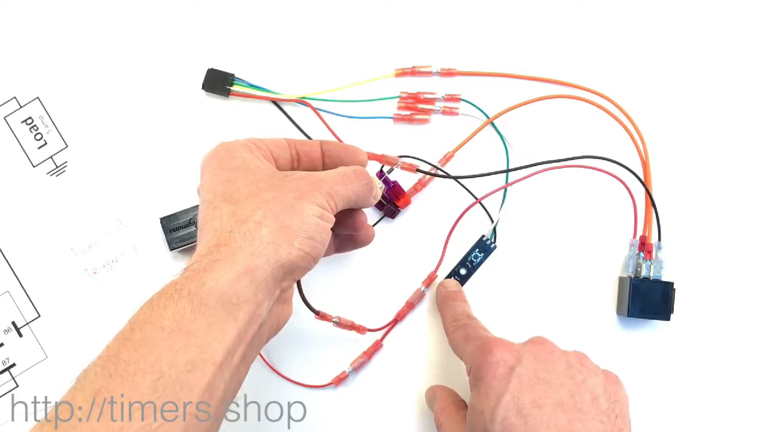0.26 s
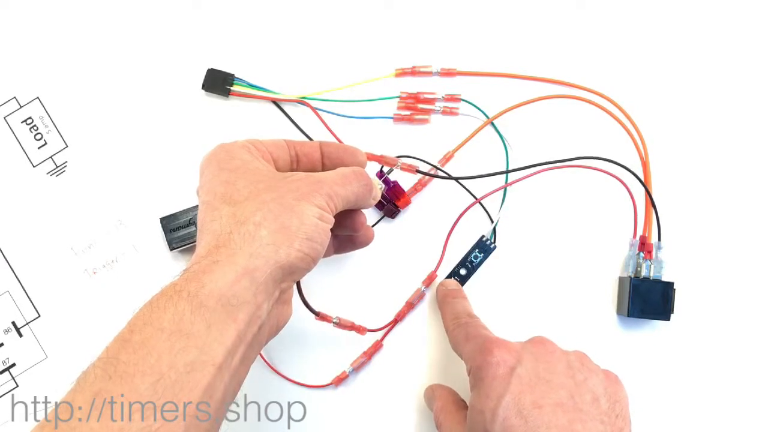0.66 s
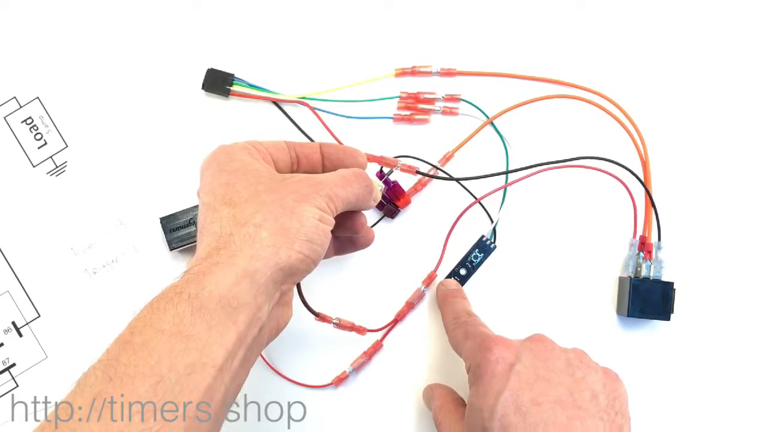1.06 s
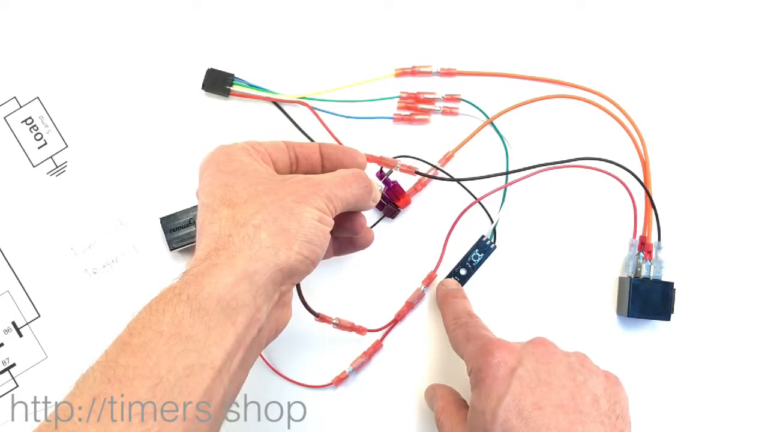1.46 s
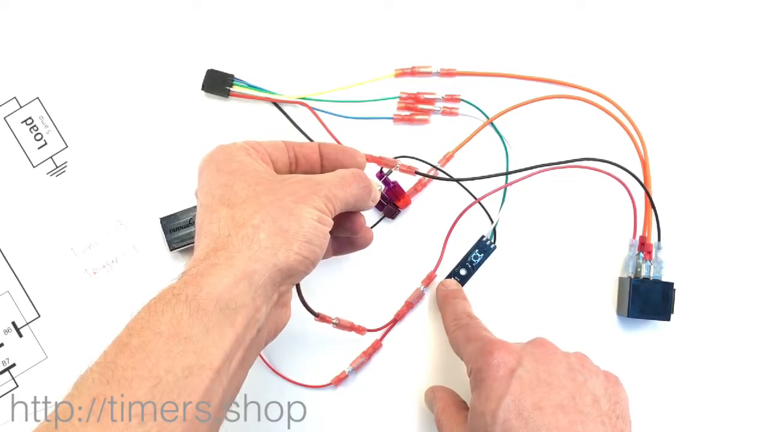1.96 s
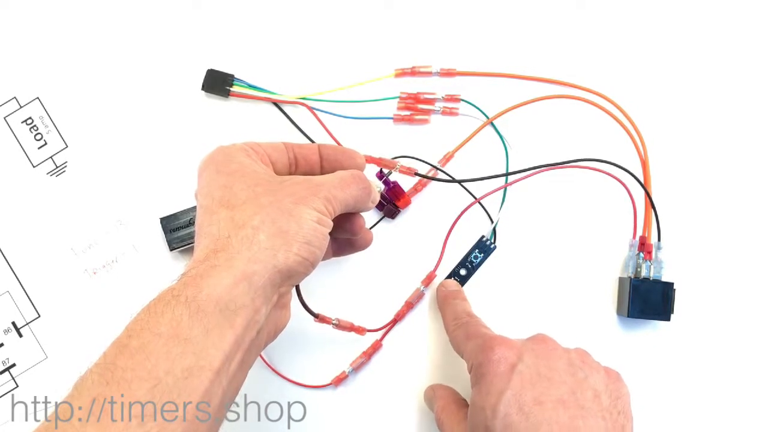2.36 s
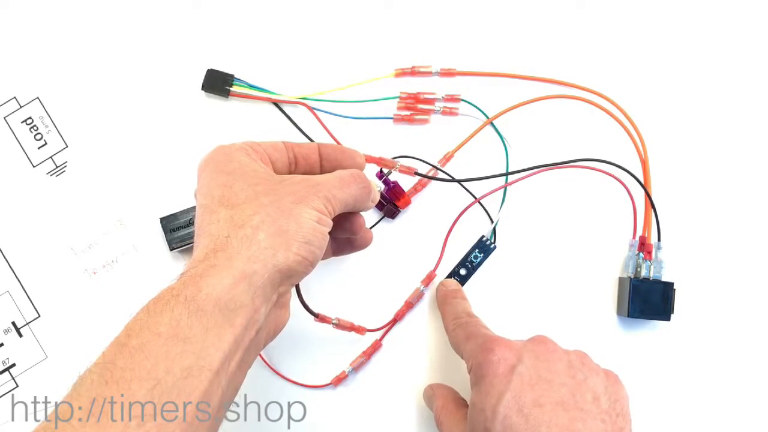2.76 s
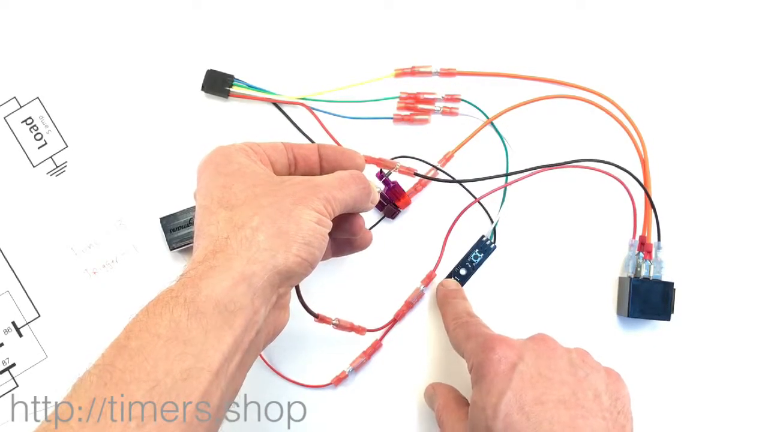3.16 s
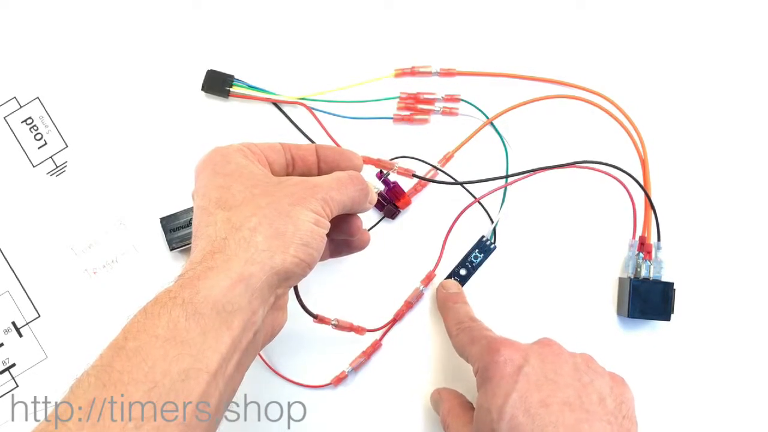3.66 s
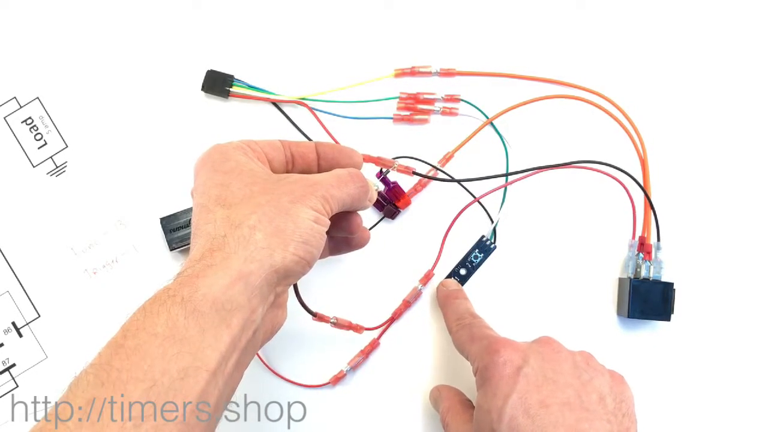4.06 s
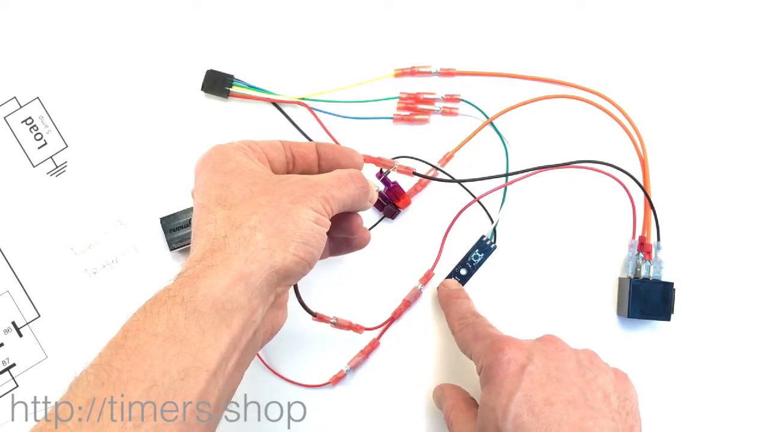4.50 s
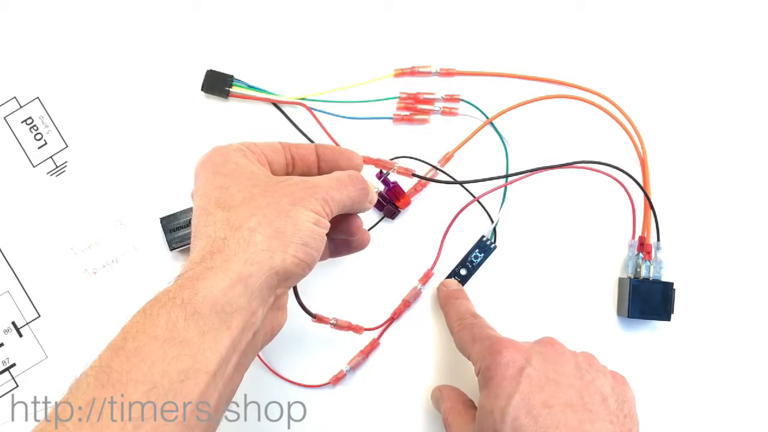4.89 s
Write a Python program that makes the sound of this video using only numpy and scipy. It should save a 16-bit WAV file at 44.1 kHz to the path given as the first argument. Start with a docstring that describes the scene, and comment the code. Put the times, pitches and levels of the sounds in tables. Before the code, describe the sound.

A small relay clicks off and on in crisp, evenly paced pairs, each led by the faint tick of a tiny button.

```python
"""Push button and timer relay on a work table

A fingertip works a tiny button about every 0.65 s. After each release a timer drops a small, close relay
out and pulls it in again a fifth of a second later: two clicks of bouncing, ringing metal. The table top
thuds under button and relay. A small room answers, over a low rumble and a faint hiss that steps up
at some of the clicks and cuts off a moment later."""
import sys
import numpy as np
from scipy import signal
from scipy.fft import rfft, irfft, next_fast_len
from scipy.io import wavfile
from scipy.ndimage import uniform_filter1d

SR = 44100
rng = np.random.default_rng(int(sys.argv[2]) if len(sys.argv) > 2 else 0)


def generate_wav(sig):
    """Save sig (samples, or channels by samples) to the path in sys.argv[1] as 16-bit PCM at SR."""
    pcm = np.round(np.clip(np.atleast_2d(sig).T, -1, 1) * 32767).astype(np.int16)
    wavfile.write(sys.argv[1], SR, pcm)


N = 226365

# the finger on the button: pressed_s, released_s, force_db
PRESSES = [(-.33, -0.2124, 0), (.3357, .429, -1.5), (0.9464, 1.0906, 1), (1.579, 1.7122, 0),
           (2.253, 2.3766, 3), (2.9329, 3.057, -1), (3.6263, 3.7501, .5), (4.301, 4.415, -1),
           (5.041, 5.17, -0.5)]
TIMER_DELAY_S, RELAY_OFF_S = .111, .1965  # from release to drop-out, from drop-out to pull-in
DROP_TIMES_S = [released_s + TIMER_DELAY_S for _, released_s, _ in PRESSES]
PULL_TIMES_S = [drop_s + RELAY_OFF_S for drop_s in DROP_TIMES_S]


def relay_pull_in(gain_db):
    """The coil snaps the armature onto the core."""
    # impacts within one stroke: delay_s, level_db, tilt_db_per_octave
    impacts = [(0, 0.96, -1.5), (.002, -0.4, 1), (.0027, -5.5, -0.9), (.00463, 2.5, .5)]
    # ring of core, yoke and case: pitch_hz, level_db, t60_s
    core_modes = [(2150, -20, 0.068), (2440, -12, 0.031), (3030, -12, 0.022), (2874, -12.5, 0.045),
                  (3296, -6, 0.025), (3720, -4.5, 0.0098), (4005, -9.5, 0.039), (4290, -3.5, 0.012),
                  (4540, -9.5, 0.011), (5366, -21.5, 0.04), (6100, -17.5, 0.011), (6630, -16.5, 0.015),
                  (7430, -24, 0.05), (9800, -30, 0.056), (10550, -20, 0.022), (10960, -16.5, 0.016),
                  (11430, -19, 0.012)]
    # their dense, quickly damped modes: frequency_hz, density_db
    core_crack = [(600, -54), (1450, -19), (1950, -7.5), (2300, 8), (4450, 0.5), (5200, -6.5), (6600, -3),
                  (8000, -11.5), (11100, 0.5), (12300, -10.5), (15500, -8.5), (16300, -24)]
    return relay_strokes(PULL_TIMES_S, gain_db, impacts, core_modes, core_crack,
                         crack_t60=.017, snap_db=4.5, snap_t60=0.0049, thud_db=-22.5)


def relay_drop_out(gain_db):
    """The spring throws the armature back; the blade pings just before it hits the back stop."""
    # impacts within one stroke: delay_s, level_db, tilt_db_per_octave
    impacts = [(.0032, -4.5, -1.5), (.0038, 0, 1), (.0044, -11.5, 4.5), (.0078, -7, 3)]
    # ring of the contact spring and back stop: pitch_hz, level_db, t60_s
    spring_modes = [(2305, -10.5, 0.015), (2720, -9.5, 0.017), (3365, -24, 0.056), (3936, -27.5, 0.06),
                    (4934, -9.5, 0.028), (6150, -5, 0.015), (6520, -19, 0.017), (7190, -13, 0.024),
                    (9100, -11, 0.018), (9840, -19, 0.014), (10290, -14.5, 0.039), (10700, -5, 0.024),
                    (10900, -31, 0.017), (12700, -16, 0.023), (15500, -7, .016)]
    # their dense, quickly damped modes: frequency_hz, density_db
    spring_crack = [(600, -26), (1300, -23), (2000, -1.5), (4000, -4.5), (7000, -7), (8000, -20),
                    (9300, -2), (10500, 2), (11800, -9.5), (13000, -2.5), (14100, -20), (15500, -5),
                    (16300, -23)]
    pings = blade_pings(gain_db)
    return pings + relay_strokes(DROP_TIMES_S, gain_db, impacts, spring_modes, spring_crack,
                                 crack_t60=0.02, snap_db=8.5, snap_t60=0.0047, thud_db=-36.5)


def relay_strokes(times_s, gain_db, impacts, modes, spectrum, crack_t60, snap_db, snap_t60, thud_db):
    """Every stroke is the same quick run of impacts: contacts meet, the armature lands and bounces."""
    t = np.arange(SR // 4) / SR
    track = np.zeros(N)
    # a hard snap at the moment of contact, on top of the slower decay of the whole mechanism
    new_crack = lambda: burst(spectrum, t, crack_t60) + amp(snap_db) * burst(spectrum, t, snap_t60)
    common_crack = new_crack()
    common_share = 0.34  # of the crack's power, alike in all impacts
    # the same parts meet in the same places, so each impact keeps its sound from stroke to stroke
    for delay_s, impact_db, tilt in impacts:
        crack = np.sqrt(common_share) * common_crack + np.sqrt(1 - common_share) * new_crack()
        hardness = lambda hz: tilt * np.log2(np.clip(hz, 1000, SR) / 5000)
        blow = coloured(ring(modes, t, scatter_db=-0.8) + crack, hardness)
        for start_s in times_s:
            add(track, start_s + delay_s, amp(gain_db + impact_db + 0.14 * rng.standard_normal()) * blow)
    track = small_case(track)
    for start_s in times_s:  # the low end comes from the table
        thud = table_thud(rise_s=0.006, ring_db=5)
        add(track, start_s + 0.00087, amp(gain_db + thud_db) * thud)
    return track


def blade_pings(gain_db):
    """The contact blade rings as it springs free at each drop-out."""
    # ring of the blade: pitch_hz, level_db, t60_s
    blade_modes = [(2560, -11, 0.014), (3853, -1, 0.025), (4520, -7, 0.0047), (6440, -16, .005),
                   (10300, -13, 0.0068), (13200, -10, 0.0077)]
    t = np.arange(SR // 10) / SR
    track = np.zeros(N)
    for start_s in DROP_TIMES_S:
        add(track, start_s, amp(gain_db) * ring(blade_modes, t, scatter_db=1))
    return small_case(track)


def small_case(x, corner_hz=1100):
    """A case much smaller than the wavelength radiates little bass."""
    return signal.sosfilt(signal.butter(3, corner_hz, 'high', fs=SR, output='sos'), x)


def button():
    """A metal dome ticks going down and softly coming up; the fingertip bumps the table both ways."""
    # tick of the dome: frequency_hz, density_db
    tick_spectrum = [(800, -13), (3500, -5.5), (6000, -8), (7500, -2), (8150, 7.5), (9500, 0.5),
                     (12000, -1), (15500, -6)]
    t = np.arange(SR // 4) / SR
    track = np.zeros(N)
    for pressed_s, released_s, force_db in PRESSES:
        press = (pressed_s, force_db - 44.5, force_db - 55)
        lift = (released_s, -68, -56)
        for start_s, tick_db, thud_db in (press, lift):
            snap = amp(3) * burst(tick_spectrum, t, t60=0.0022)
            tail = burst(tick_spectrum, t, t60=0.029)
            add(track, start_s, amp(tick_db) * (snap + tail))
            add(track, start_s, amp(thud_db) * table_thud(rise_s=0.00043, ring_db=-8))
    return track


def table_thud(rise_s, ring_db):
    """A blow spreads through the table top: a few low notes ring over a short, dull wash."""
    # ring of the table top: pitch_hz, level_db, t60_s
    table_modes = [(168.8, -21.5, 0.42), (268.9, -11.5, 0.44), (422.5, -13.5, 0.26), (448, -6.5, 0.25),
                   (590, -24, 0.03), (664.3, -2, 0.16), (825, -1, 0.049)]
    # its damped modes in between: frequency_hz, density_db
    wash_spectrum = [(60, 12.5), (250, 18), (750, 13.5), (1100, 2.5), (2500, -10), (6000, -35)]
    t = np.arange(SR // 3) / SR
    wash = noise(wash_spectrum, len(t)) * amp(-60 * t / 0.12)
    attack = 1 - np.exp(-t / rise_s)
    return (amp(ring_db) * ring(table_modes, t, scatter_db=2) + wash) * attack


def room_reverb(x):
    """The walls answer after a short gap, each frequency dying at its own speed."""
    # decay of the room: frequency_hz, t60_s
    decay_times = [(200, 0.9), (2000, 0.13), (6000, 0.15), (10000, 0.21), (16000, 0.11)]
    hz, t, bands = signal.stft(rng.standard_normal(SR // 2), SR, nperseg=256)
    decay = amp(-60 * t / along(decay_times, hz)[:, None])
    tail = signal.istft(bands * decay, SR, nperseg=256)[1]
    tail *= 1 - np.exp(-(np.arange(len(tail)) / SR / 0.0021) ** 2)  # fades in over a few milliseconds
    return signal.fftconvolve(x, tail / np.linalg.norm(tail))[:N]


def room_tone(rumble_db, drone_db):
    """A steady bed of rumble with a narrow drone at 168 Hz."""
    # rumble of the room: frequency_hz, density_db
    rumble_spectrum = [(16, -32), (28, 0.5), (59, -1.5), (106, -9), (171, -11), (342, -17), (393, -26.5),
                       (478, -26.5), (767, -22.5), (834, -23), (1300, -24), (2400, -27.5), (2920, -28.5),
                       (4680, -33), (15500, -38.5)]
    drone = noise([(135, -62), (160, -10), (168, 21.0), (176, -11.5), (205, -52)], N)
    return amp(rumble_db) * noise(rumble_spectrum, N) + amp(drone_db) * drone


def gated_hiss(level_db, hold_s):
    """A faint hiss switches on abruptly and cuts off hold_s after the nearest pull-in."""
    # colour of the hiss: frequency_hz, density_db
    hiss_spectrum = [(410, 0), (700, -5), (1270, -3.5), (4950, -6), (6020, -6.5), (10400, -10),
                     (15500, -12)]
    # moments when the hiss steps up: start_s
    hiss_starts = [0, .737, 1.203, 2.685, 4.056]
    t = np.arange(N) / SR
    gate = np.zeros(N)
    for start_s in hiss_starts:
        nearest_pull_s = min(PULL_TIMES_S, key=lambda pull_s: abs(pull_s - start_s))
        gate += (t >= start_s) & (t < nearest_pull_s + hold_s)
    return amp(level_db) * uniform_filter1d(gate, size=200) * noise(hiss_spectrum, N)


def ring(modes, t, scatter_db):
    """Damped modes of alternating sign, their strengths slightly scattered."""
    return sum((-1) ** k * amp(db + scatter_db * rng.standard_normal() - 60 * t / t60)
               * np.sin(2 * np.pi * hz * t) for k, (hz, db, t60) in enumerate(modes))


def burst(spectrum, t, t60):
    """Many close modes dying together: decaying noise, evened out and then coloured."""
    decaying = rng.standard_normal(len(t)) * amp(-60 * t / t60)
    power = np.abs(uniform_filter1d(np.abs(rfft(decaying)) ** 2, size=120)) + 1e-12
    uneven_db = 10 * np.log10(power / power.mean())
    grid_hz = np.fft.rfftfreq(len(t), 1 / SR)
    return coloured(decaying, lambda hz: along(spectrum, hz) - np.interp(hz, grid_hz, uneven_db))


def noise(spectrum, size):
    """Coloured noise of rms 1."""
    x = filtered(rng.standard_normal(size), lambda hz: amp(along(spectrum, hz)))
    return x / np.sqrt(np.mean(x ** 2) + 1e-20)


def coloured(x, gain_db):
    """Minimum-phase EQ: nothing sounds before the blow."""
    size = next_fast_len(2 * len(x))
    cepstrum = irfft(np.log(amp(gain_db(np.fft.rfftfreq(size, 1 / SR)))), size)
    cepstrum[1:size // 2] *= 2
    cepstrum[size // 2 + 1:] = 0
    return irfft(rfft(x, size) * np.exp(rfft(cepstrum)), size)[:len(x)]


def filtered(x, response):
    """Zero-phase EQ with a gain of response(hz)."""
    size = next_fast_len(len(x) + 8192)
    return irfft(rfft(x, size) * response(np.fft.rfftfreq(size, 1 / SR)), size)[:len(x)]


def along(points, hz):
    """Read a curve of (frequency_hz, value) points on a log frequency axis."""
    frequencies, values = np.transpose(points)
    return np.interp(np.log(hz + 1), np.log(frequencies), values)


def amp(db):
    """Decibels to gain."""
    return 10 ** (np.asarray(db) / 20)


def add(track, start_s, sound):
    """Mix a sound into the track, trimming what falls outside."""
    start = round(start_s * SR)
    sound = sound[max(-start, 0):]
    part = track[max(start, 0):][:len(sound)]
    part += sound[:len(part)]


def scene():
    """Relay and button up close, with a little room and a quiet bed of noise, in mono."""
    close = relay_pull_in(gain_db=-27) + relay_drop_out(gain_db=-27.5) + button()
    reverb = amp(-15) * room_reverb(close)
    bed = room_tone(rumble_db=-59, drone_db=-71) + gated_hiss(level_db=-58.5, hold_s=.407)
    return (close + reverb + bed)[None]


def record(dry):
    """A steep low-pass takes off the very top of the treble."""
    cutoff_hz = 15800
    return filtered(dry[0], lambda hz: 1 / np.sqrt(1 + (hz / cutoff_hz) ** 160))[None]


dry = scene()
out = record(dry)
generate_wav(out)
```